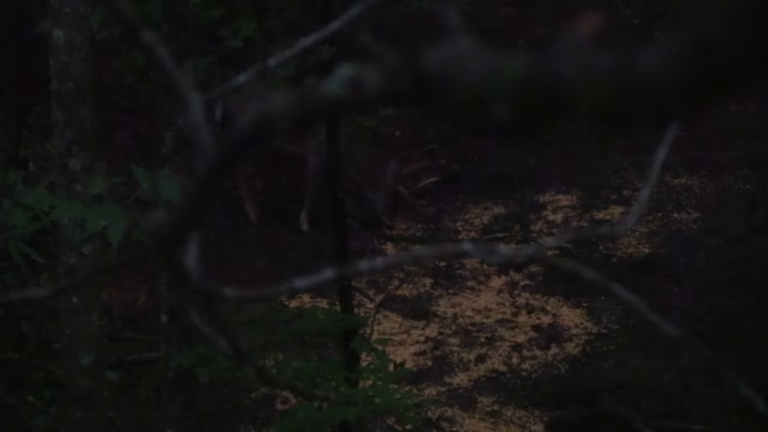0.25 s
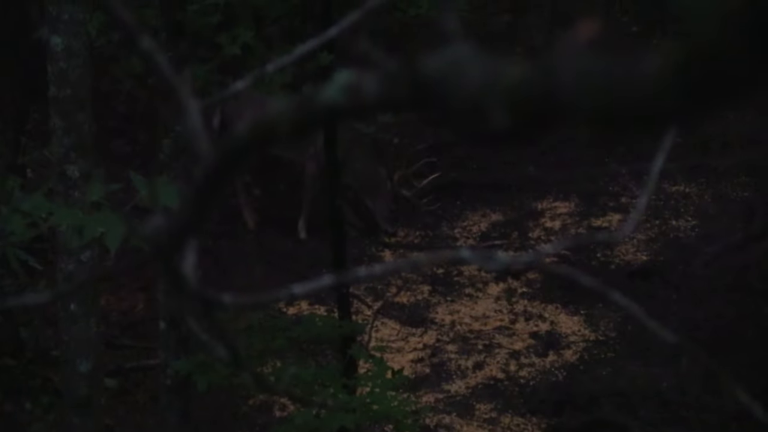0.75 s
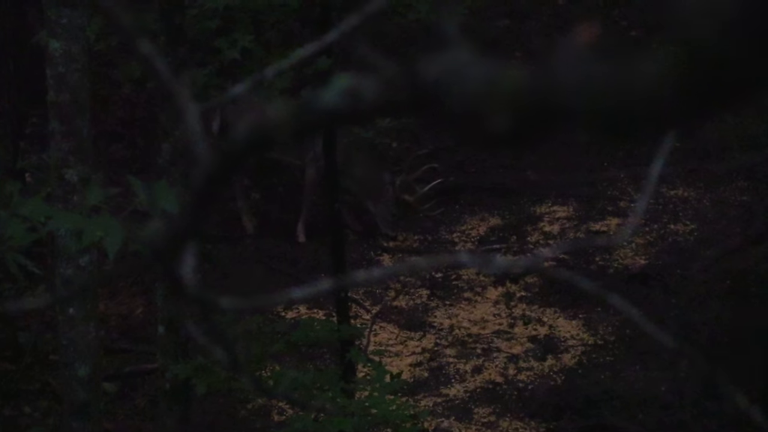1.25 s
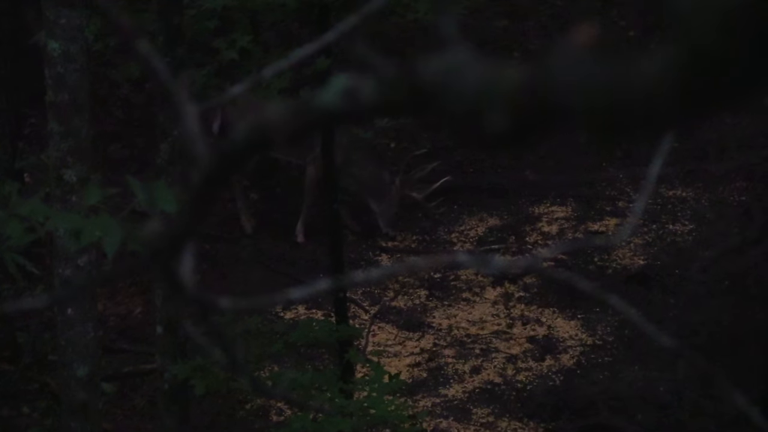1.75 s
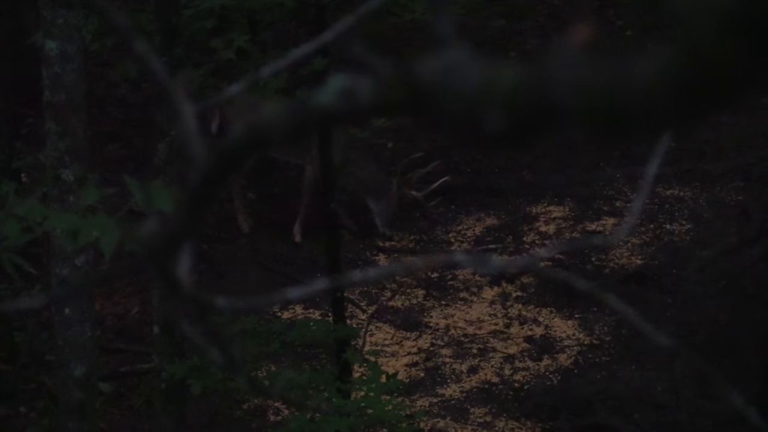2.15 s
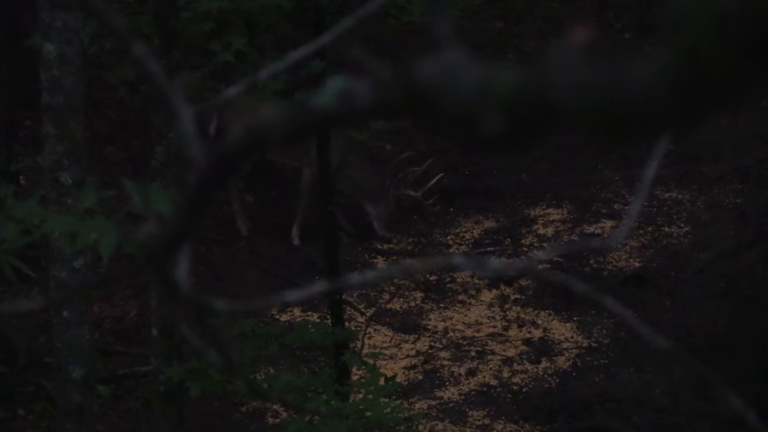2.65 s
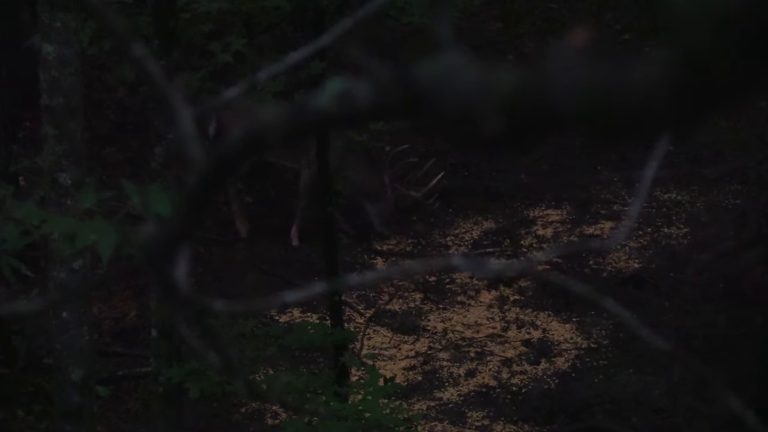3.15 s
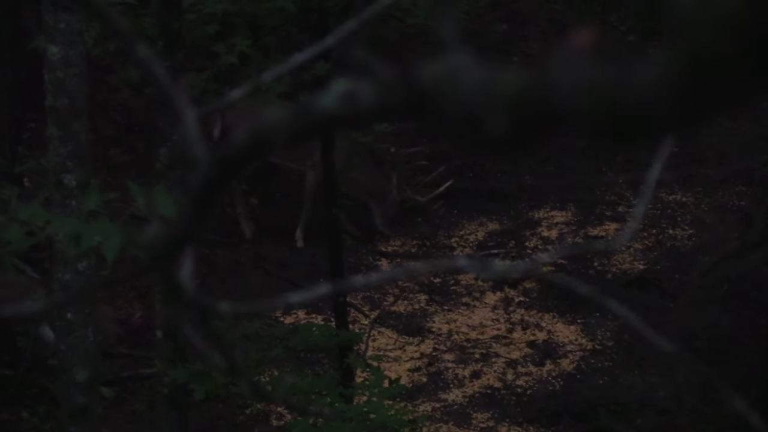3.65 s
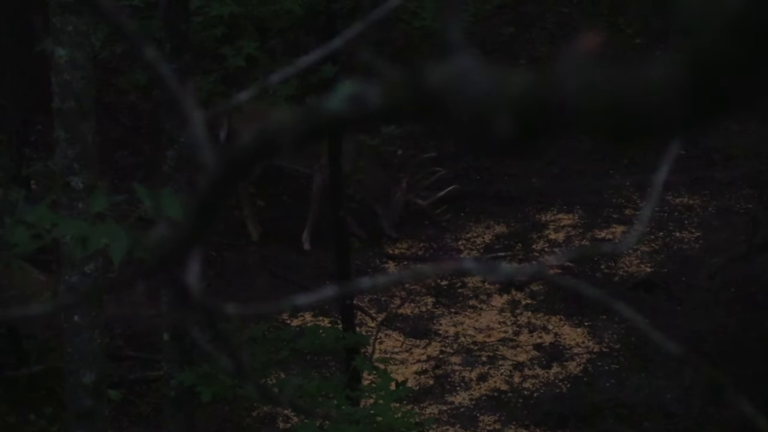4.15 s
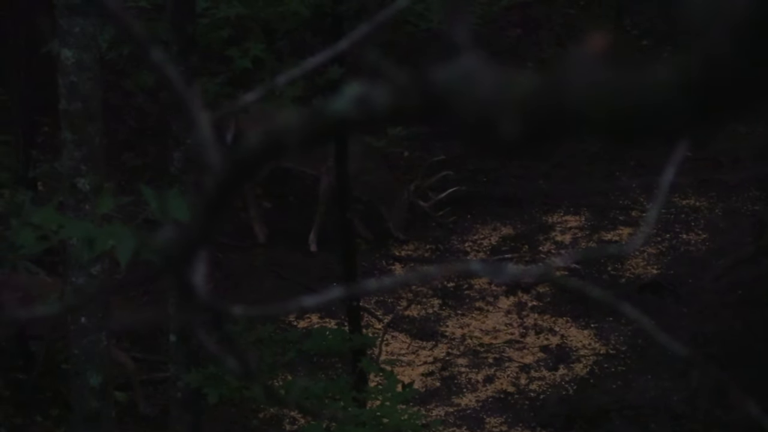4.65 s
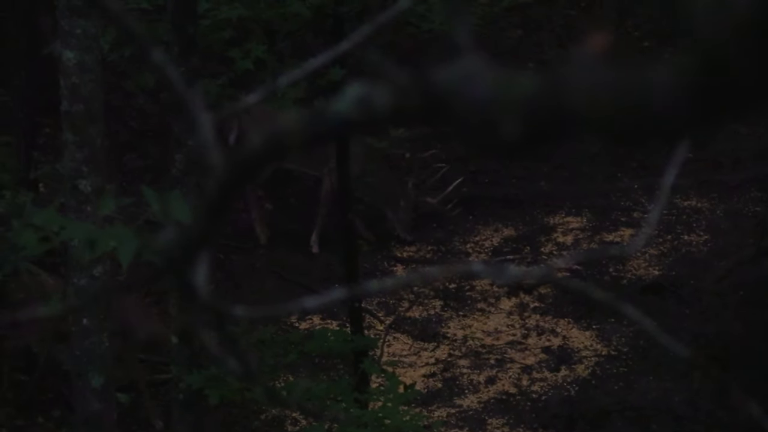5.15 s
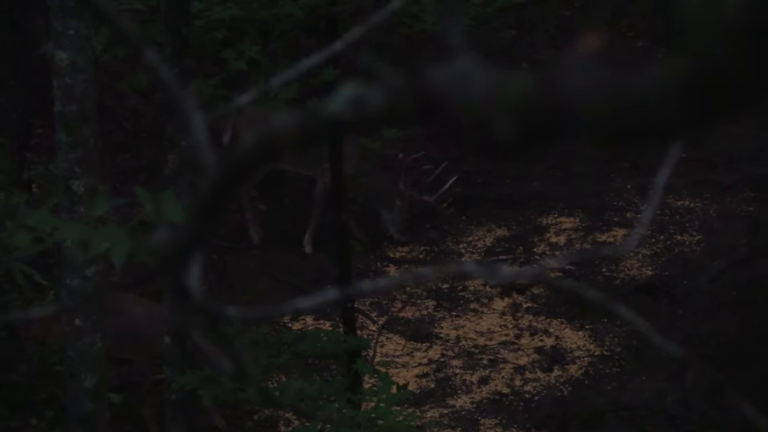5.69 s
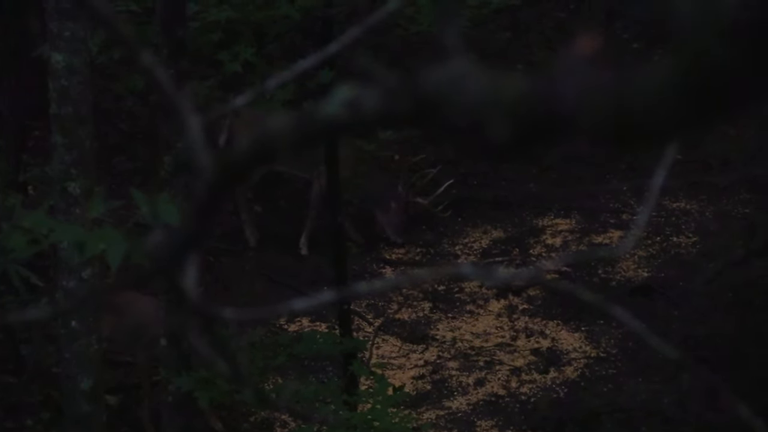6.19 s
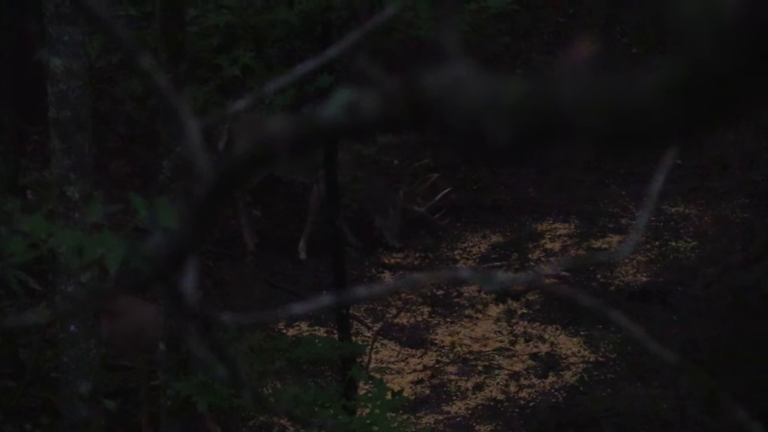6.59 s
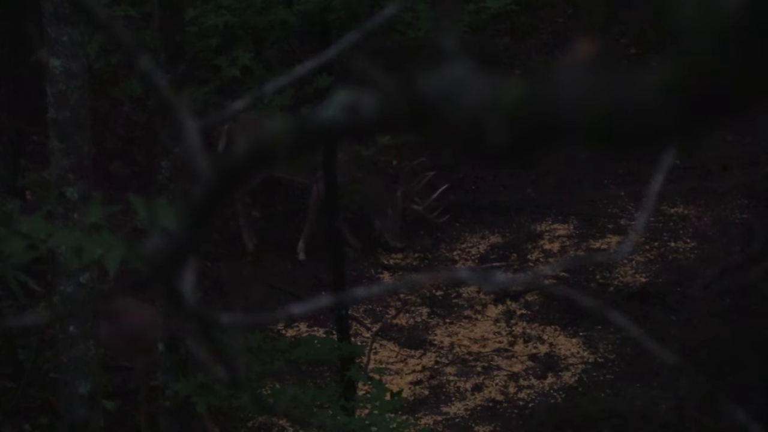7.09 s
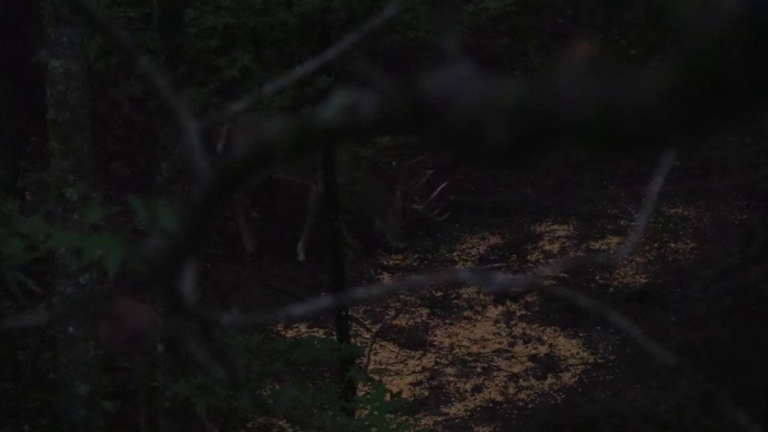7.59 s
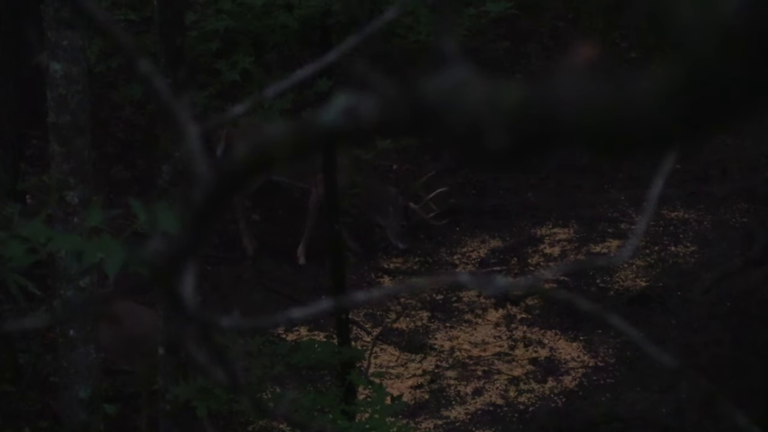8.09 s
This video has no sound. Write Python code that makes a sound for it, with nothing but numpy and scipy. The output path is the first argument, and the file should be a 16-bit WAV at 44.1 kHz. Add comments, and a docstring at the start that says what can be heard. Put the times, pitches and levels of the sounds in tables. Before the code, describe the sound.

Outdoors among wet trees, a soft, even wash of far drops lies under a dense patter on foliage. Single heavy drips smack nearby leaves throughout, the strongest around the middle, mixed with fine ticking droplets and brief little sprays. A drop rings once on metal near the beginning, and again very faintly later on. The close drips sound crisp, with a short woodland echo.

```python
"""A wet forest drips after rain, heard in mono. Each drop is an impulse that sets a leaf vibrating.
Countless far drops merge into a soft wash, nearer ones patter, and heavy drips slap leaves close by,
some scattering into spray, while fine droplets tick; trunks and foliage return a short echo.
Twice a drop excites the modes of a small metal object nearby: one bright ping and one very faint one."""
import sys
import numpy as np
from scipy import signal
from scipy.fft import rfft, irfft, next_fast_len
from scipy.io import wavfile
from scipy.ndimage import uniform_filter1d

SR = 44100
rng = np.random.default_rng(int(sys.argv[2]) if len(sys.argv) > 2 else 0)


def unload_wav(signal):
    """Save mono or channel-first audio to the path in sys.argv[1] as 16-bit WAV at rate SR, clipped to [-1, 1]."""
    wavfile.write(
        sys.argv[1],
        SR,
        np.round(np.clip(np.atleast_2d(signal).T, -1, 1) * 32767).astype(np.int16),
    )


N = 367353

# spectral envelope of the far drops: frequency_hz, relative_level_db
WASH_SPECTRUM = [(15, -67), (25, -27.5), (107, -30), (161, -27), (527, -9), (1060, -3), (1680, -1),
                 (2520, -1), (3880, -2.5), (8730, -12.5), (12400, -20.5), (14200, -28), (15800, -33.5)]
# filter that colours the nearer drops: frequency_hz, relative_gain_db
PATTER_COLOUR = [(100, -46), (300, -8.5), (700, -5.5), (1400, 0.5), (2200, 1), (3800, -6.5), (5500, -13),
                 (9000, -17.5), (12500, -17), (15800, -46)]
# heavy drips on near leaves: start_s, relative_level_db, bending_hz, bending_q, cutoff_hz, splash_db
HEAVY_DRIPS = [(0.0269, -32, 950, 1.2, 3500, -57), (0.1785, -35, 1040, 0.7, 4100, -59),
               (0.5973, -36.5, 1990, 2.5, 5000, -54), (0.9205, -35, 1260, 0.8, 4000, -57),
               (1.1148, -32.0, 1800, 2.1, 3200, -51), (1.1697, -32.5, 1700, 0.67, 2400, -52),
               (1.3055, -34.0, 1340, 1.3, 4200, -39), (1.3743, -34.5, 840, 0.8, 5500, -48),
               (1.4902, -36.5, 1300, 0.9, 5400, -62), (2.085, -30, 1140, 0.87, 4200, -59),
               (2.2835, -33.5, 1690, 0.8, 2700, -58), (2.4278, -33.5, 1100, 1.1, 4500, -58),
               (2.4724, -35.5, 840, 1.1, 3400, -59), (2.6672, -24.5, 680, 0.54, 1690, -44),
               (2.6996, -30, 1820, 1.9, 2500, -52), (3.0336, -36.5, 1040, 2.3, 4100, -57),
               (3.2605, -34.0, 990, 0.28, 4600, -54), (3.549, -34.5, 1990, 3.4, 3200, -50),
               (3.7762, -36.0, 1830, 3.5, 5600, -52), (3.9251, -26, 1470, 1.5, 3500, -38.5),
               (4.5329, -29.5, 1300, 0.8, 3900, -42), (4.5663, -24.0, 1170, 0.65, 3400, -45),
               (4.91, -32, 1330, 1.5, 5100, -45), (5.1414, -35.5, 1760, 1.7, 7000, -42),
               (5.8869, -36, 1260, 2.6, 3400, -60), (5.8978, -35, 1530, 2.4, 5100, -60),
               (5.933, -32.0, 670, 1.3, 4500, -51), (6.527, -28, 1560, 0.5, 3400, -46),
               (6.9157, -32.0, 1370, 0.7, 5000, -43), (6.9896, -32.0, 1090, 0.62, 3300, -56),
               (7.0896, -29.5, 1200, 2.2, 4000, -45), (7.121, -32, 1700, 4.0, 2500, -52),
               (8.1528, -35, 2150, 2.3, 2900, -53)]
# drops on the metal: start_s, strength_db, low_cutoff_hz
METAL_STRIKES = [(0.393, 0.5, 300), (5.5997, -15, 7000)]
# normal modes of the metal: pitch_hz, relative_level_db, t60_s
METAL_MODES = [(833, -36, 0.041), (2689, -30, 0.605), (3245, -36, 0.541), (4437, -26, 0.235),
               (4511, -44, 0.361), (6161, -36, 0.109), (7329, -33, 0.132), (7460, -34, 0.069),
               (7703, -35, 0.133), (7744, -30, 0.149), (8186, -35, 0.106), (8246, -27, 0.074),
               (8939, -33, 0.095), (8995, -37, 0.084), (10021, -33, 0.051), (10575, -34, 0.085),
               (11214, -37, 0.018), (12661, -32, 0.016), (13069, -41, 0.055), (13977, -40, 0.045),
               (14273, -46, 0.044), (14422, -49, 0.061), (15563, -55, 0.073)]
# the sharpest fine droplets close by: start_s, level_db
SHARP_DROPLETS = [(0.4598, -46), (3.0182, -45), (3.9323, -41), (6.5124, -45), (7.5362, -46), (7.876, -43),
                  (7.9074, -46)]
# bursts of little drops shed by a shaken leaf: start_s, drop_level_db, pitch_hz, length_s
SHED_SPRAYS = [(1.237, -41.5, 2130, .03), (2.97, -41.5, 3500, 0.07), (3.391, -42, 2000, 0.051),
               (6.237, -39.5, 3100, 0.041), (7.861, -42.5, 3700, 0.038)]


def undb(db):
    """Amplitude grows tenfold for every 20 dB."""
    return 10 ** (np.asarray(db) / 20)


def unit(x):
    """Division by the rms gives a signal unit power."""
    return x / np.sqrt(np.mean(x ** 2))


def add(out, start_s, sound):
    """Superposition: a sound adds to those already present."""
    i = max(int(round(start_s * SR)), 0)
    out[i:i + len(sound)] += sound[:max(N - i, 0)]


def response(points, size=1024):
    """Minimum phase: a spectrum of (frequency_hz, gain_db) points sets a causal impulse response."""
    hz, db = np.transpose(points)
    f = np.maximum(np.arange(size // 2 + 1) * SR / size, 1)
    gain = undb(np.interp(np.log(f), np.log(hz), db))
    cepstrum = irfft(np.log(gain))
    cepstrum[1:size // 2] *= 2
    cepstrum[size // 2 + 1:] = 0
    return irfft(np.exp(rfft(cepstrum)))


def through(x, impulse_response):
    """Linear filtering is convolution, here cut to the input's length."""
    return signal.oaconvolve(x, impulse_response)[:len(x)]


def flicker(rate_hz):
    """A moving average smooths random steps into a fluctuation of rms 1."""
    hold = int(SR / rate_hz)
    steps = np.repeat(rng.standard_normal(N // hold + 2), hold)
    return unit(uniform_filter1d(steps, hold)[:N])


def poisson_drops(per_s, limit=64):
    """Independent arrivals have exponential gaps; rows of start_s, nearness and size (both 0-1)."""
    chance, nearness, size = rng.random((limit, 3)).T
    start_s = np.cumsum(-np.log(1 - chance)) / per_s
    return np.c_[start_s, nearness, size][start_s < N / SR]


def far_wash(flicker_db=0.5, flicker_hz=35, bands=9):
    """Incoherent summation: far drops blur into a hiss whose bands flicker independently."""
    hiss = through(rng.standard_normal(N), response(WASH_SPECTRUM, size=4096))
    size = next_fast_len(N)
    spectrum = rfft(hiss, size)
    f = np.linspace(1, SR / 2, len(spectrum))
    band_index = np.interp(np.log(f), np.log(np.geomspace(250, 13000, bands)), np.arange(bands))
    out = np.zeros(N)
    for k in range(bands):
        triangle = np.maximum(1 - abs(band_index - k), 0)
        out += irfft(spectrum * triangle, size)[:N] * undb(flicker_db * flicker(flicker_hz))
    return unit(out)


def slap(hz, q, cutoff_hz, ring_s, flutter, settle_s=0.0029, size=1024):
    """Impact excitation: a leaf radiates from its bending mode up to a cutoff set by contact time."""
    f = np.geomspace(30, SR / 2, 120)
    ratio = f / hz
    resonance = ratio ** 4 / ((1 - ratio ** 2) ** 2 + (ratio / q) ** 2)
    power = resonance / (1 + (f / cutoff_hz) ** 8)
    # spreading water and neighbouring leaves keep the leaf shaking
    t = np.arange(size) / SR
    shake = rng.standard_normal(size) * np.exp(-t / ring_s) * (1 + np.exp(-t / settle_s))
    force = flutter * shake / np.linalg.norm(shake)
    force[0] += 1  # the first blow
    wave = through(force, response(np.c_[f, 10 * np.log10(power)]))
    onset_rms = np.sqrt(np.mean(wave[:SR // 250] ** 2))  # first 4 ms
    return rng.choice([-1, 1]) * wave / onset_rms


def patter(per_s=260, spread_db=3.0, leaves=36):
    """Shot noise: drops strike leaves of many sizes at random, and the nearest stand out."""
    out = np.zeros(N)
    per_leaf = int(per_s * N / SR / leaves)
    for hz in np.geomspace(550, 8000, leaves):
        moment, chance = rng.random((600, 2))[:per_leaf].T
        nearness = np.minimum(-np.log(1 - chance), 3.0)
        hits = np.zeros(N)
        hits[(moment * N).astype(int)] = undb(spread_db * nearness)
        leaf = slap(hz, q=1.8, cutoff_hz=1.37 * hz + 2200, ring_s=0.0049, flutter=0.99)
        out += np.sqrt(hz) * through(hits, leaf)  # small leaves spread energy over a wider band
    coloured = unit(through(out, response(PATTER_COLOUR)))
    return forest_echo(coloured, wet_db=-5.5, t60_s=0.2)


def forest_echo(direct, wet_db, t60_s, build_s=0.0068):
    """Multiple scattering: trunks and foliage add a short, diffuse echo to the direct sound."""
    t = np.arange(SR // 2) / SR
    envelope = np.exp(-np.log(1000) * t / t60_s) * (1 - np.exp(-t / build_s))
    scatter = rng.standard_normal(len(t)) * envelope
    colour = response([(300, -8), (3000, -7), (9000, -2), (15000, -13)])
    echo = through(scatter / np.linalg.norm(scatter), colour)
    return direct + undb(wet_db) * through(direct, echo)


def heavy_drips(leaf_gain_db=0.82, shatter_above_db=-29, fragment_gain_db=-19, fragment_delay_s=0.012):
    """Momentum transfer: a drip knocks a leaf and bursts in a bright splash; the heaviest shatter."""
    out = np.zeros(N)
    for start_s, level_db, hz, q, cutoff_hz, splash_db in HEAVY_DRIPS:
        leaf = slap(hz, q, cutoff_hz, ring_s=0.0037, flutter=1.24)
        add(out, start_s, undb(level_db + leaf_gain_db) * leaf)
        splash_hz = 6700 * 2 ** (0.5 * (rng.random() - 0.5))
        splash = slap(splash_hz, q=1.2, cutoff_hz=9800, ring_s=0.0023, flutter=1.0)
        add(out, start_s, undb(splash_db) * splash)
        if level_db > shatter_above_db:
            fragments = shower(hz=2300, length_s=0.033)
            add(out, start_s + fragment_delay_s, undb(level_db + fragment_gain_db) * fragments)
    return out


def light_drips(per_s=1.8, nearest_db=-41.5, range_db=5, leaf_hz=1800):
    """Resonance falls with size: light drips pat random leaves, and larger leaves sound lower."""
    out = np.zeros(N)
    for start_s, nearness, size in poisson_drops(per_s):
        leaf = slap(leaf_hz * 2 ** (0.5 - size), q=1.6, cutoff_hz=3600, ring_s=0.004, flutter=1.2)
        add(out, start_s, undb(nearest_db - range_db * (1 - nearness)) * leaf)
    return out


def metal_pings(splash_db=-37, thud_db=-62):
    """Modal ringing: struck metal sounds damped sines; a smaller, briefer drop misses the low modes."""
    out, t = np.zeros(N), np.arange(SR) / SR
    # the ring carries no bass; only a faint, dull thud sounds beneath it
    bass_cut = signal.butter(4, 650, "high", fs=SR, output="sos")
    thud = undb(thud_db) * np.sin(2 * np.pi * 55 * t) * np.exp(-t / 0.012)
    for start_s, strength_db, low_cutoff_hz in METAL_STRIKES:
        ring = np.zeros(SR)
        for hz, mode_db, t60_s in METAL_MODES:
            amplitude = undb(mode_db) * hz ** 2 / (hz ** 2 + low_cutoff_hz ** 2)
            decay = np.exp(-np.log(1000) * t / t60_s)
            ring += amplitude * decay * np.sin(2 * np.pi * (hz * t + rng.random()))
        add(out, start_s, undb(strength_db) * (signal.sosfilt(bass_cut, ring) + thud))
        splash = slap(8100, q=1.5, cutoff_hz=12000, ring_s=0.0033, flutter=2.5)
        add(out, start_s, undb(strength_db + splash_db) * splash)
    return out


def fine_droplets(pitch_hz=7900, spread_oct=0.4, faint_per_s=2.2, faint_db=-51, range_db=7):
    """Brief contact excites high frequencies: droplets tick, a few sharply, others faintly at random."""
    out = np.zeros(N)
    faint = [(start_s, faint_db + range_db * (nearness - 0.5))
             for start_s, nearness, _ in poisson_drops(faint_per_s)]
    for start_s, level_db in list(SHARP_DROPLETS) + faint:
        hz = pitch_hz * 2 ** (spread_oct * (rng.random() - 0.5))
        tick = slap(hz, q=1.7, cutoff_hz=1.1 * hz, ring_s=0.002, flutter=0.74)
        add(out, start_s, undb(level_db) * tick)
    return out


def sprays():
    """Shedding: a drop shakes a leaf, which lets fall a short shower of little drops, with no first blow."""
    out = np.zeros(N)
    for start_s, level_db, hz, length_s in SHED_SPRAYS:
        add(out, start_s, undb(level_db) * shower(hz, length_s))
    return out


def shower(hz, length_s, fragments=7, spread_oct=0.77):
    """Staggered impacts: a burst of little drops lands in turn on leaves of similar resonance."""
    out = np.zeros(SR // 4)
    for k, (lateness, detune) in enumerate(rng.random((fragments, 2))):
        leaf_hz = hz * 2 ** (spread_oct * (detune - 0.5))
        leaf = slap(leaf_hz, q=2.2, cutoff_hz=1.35 * leaf_hz, ring_s=0.0019, flutter=0.93)
        add(out, length_s * (k + lateness) / fragments, leaf)
    return out


def scene(wash_db=-42.5, patter_db=-47):
    """Superposition: steady canopy, pings and echoing drips sum into two identical channels."""
    canopy = undb(wash_db) * far_wash() + undb(patter_db) * patter()
    pings = metal_pings()
    drips = heavy_drips() + sprays() + fine_droplets() + light_drips()
    mono = canopy + pings + forest_echo(drips, wet_db=-11, t60_s=0.35)
    return np.array([mono, mono])


def record(dry, cutoff_hz=15850):
    """Band limiting: a steep low-pass filter removes the highest treble."""
    return signal.sosfilt(signal.ellip(10, 0.2, 70, cutoff_hz, fs=SR, output="sos"), dry)


dry = scene()
out = record(dry)
unload_wav(out)
```